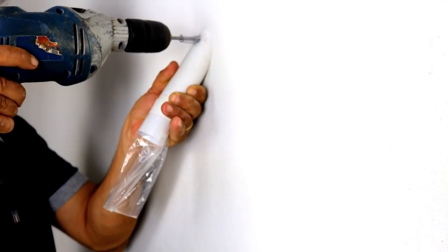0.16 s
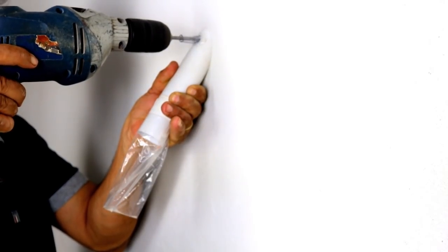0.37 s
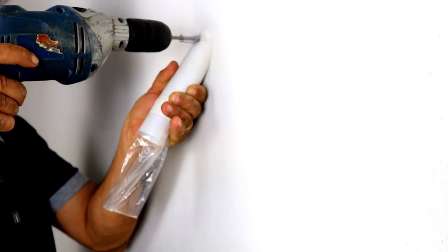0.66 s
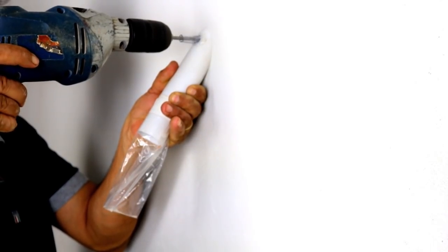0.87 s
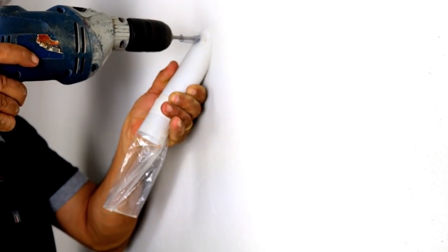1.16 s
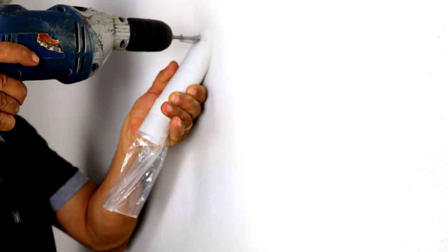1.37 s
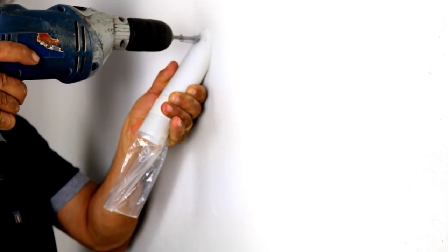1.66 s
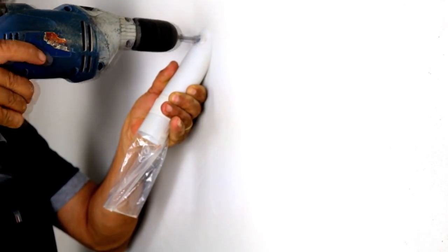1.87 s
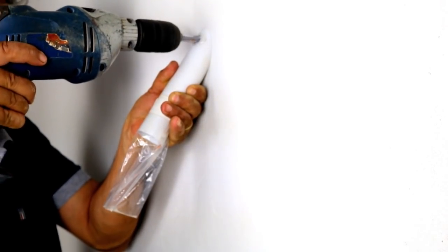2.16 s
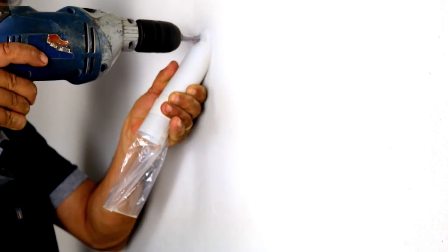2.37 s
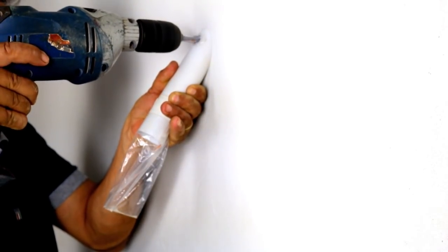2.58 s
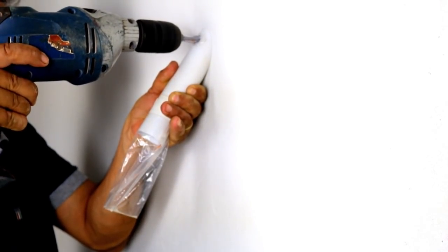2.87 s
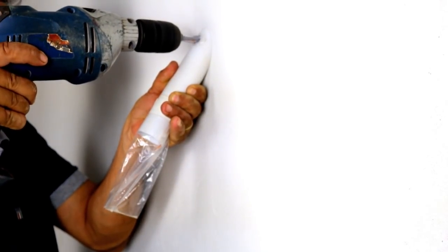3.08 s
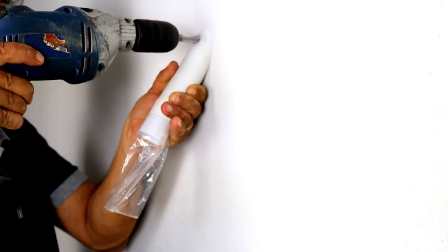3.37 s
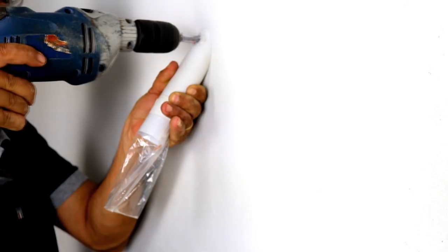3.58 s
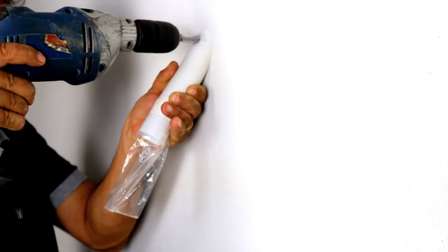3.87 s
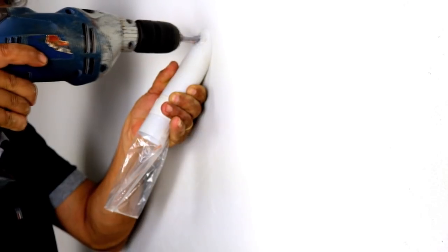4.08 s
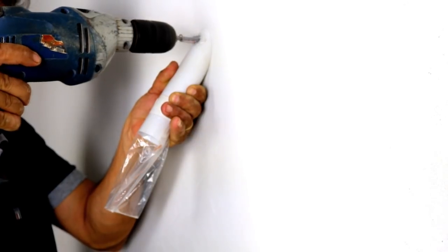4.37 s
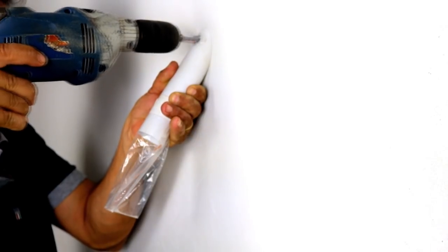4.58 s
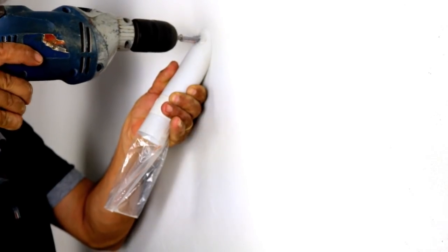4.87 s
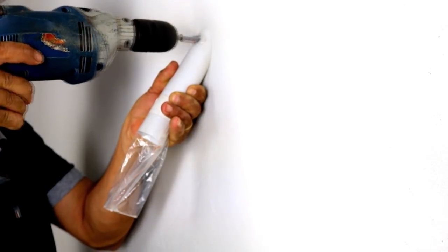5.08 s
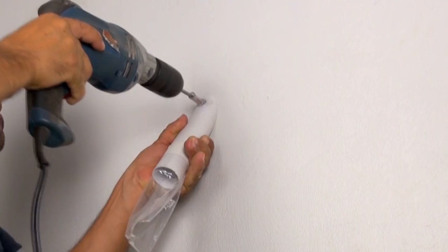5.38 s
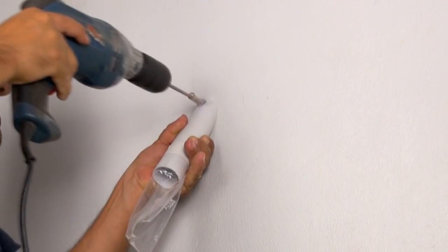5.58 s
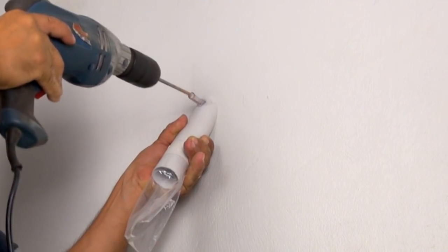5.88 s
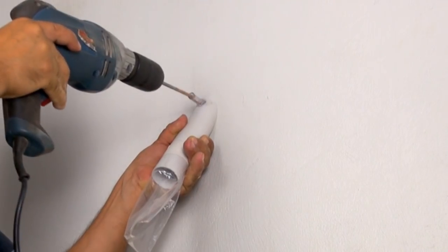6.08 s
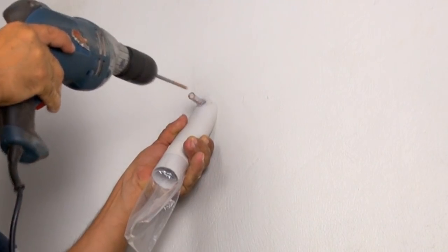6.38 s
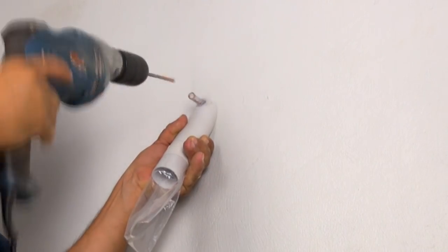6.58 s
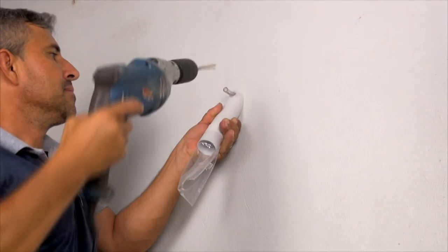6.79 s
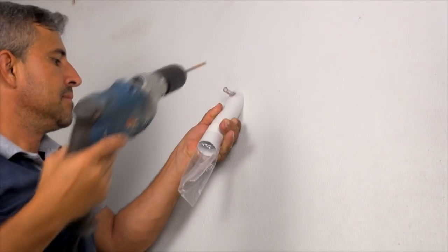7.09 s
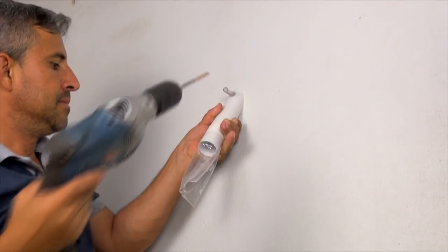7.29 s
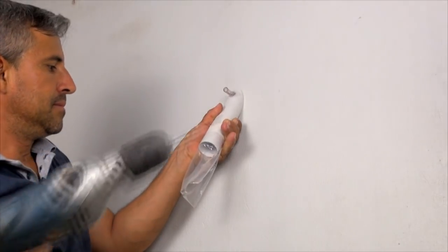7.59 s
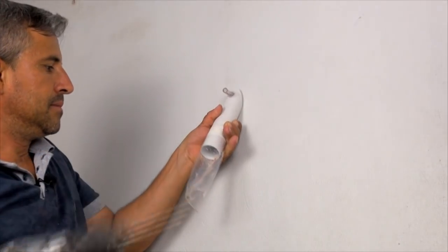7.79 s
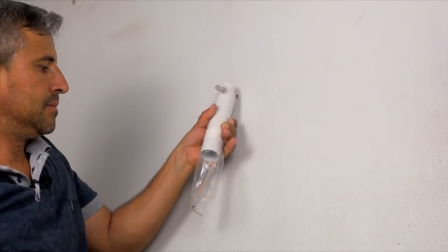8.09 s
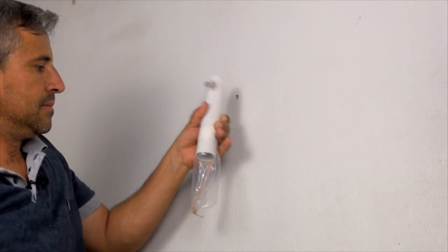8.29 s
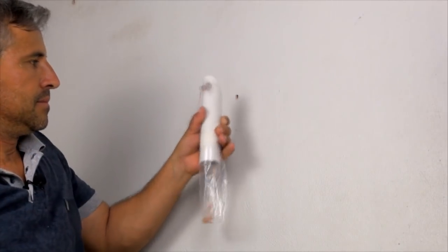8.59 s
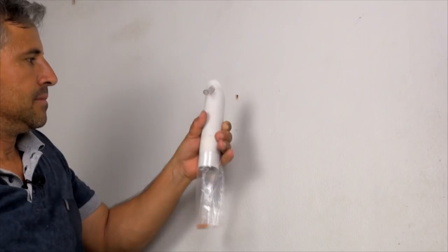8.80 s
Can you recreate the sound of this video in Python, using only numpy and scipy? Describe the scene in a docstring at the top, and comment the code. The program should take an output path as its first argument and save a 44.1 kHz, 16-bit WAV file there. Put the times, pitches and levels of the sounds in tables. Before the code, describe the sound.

A corded drill bores loudly into a wall, revs once more and winds down, followed by a brief plastic bag crinkle.

```python
"""Hammer drill in masonry

A corded drill bores into a wall indoors, its ratchet hammering at first. It is pulled out, spun up
once more and let go, so that fan whine, gear mesh and chuck throb wind down. A plastic bag rustles
at the end. One close microphone, buffeted by the fan's air and overloaded at full speed."""
import sys
import numpy as np
from scipy import signal
from scipy.fft import rfft, irfft, next_fast_len
from scipy.io import wavfile
from scipy.ndimage import uniform_filter1d

SR = 44100
rng = np.random.default_rng(int(sys.argv[2]) if len(sys.argv) > 2 else 0)


def generate_wav(sig):
    """Save sig (samples, or channels by samples) to the path in sys.argv[1] as 16-bit PCM at SR."""
    pcm = np.round(np.clip(np.atleast_2d(sig).T, -1, 1) * 32767).astype(np.int16)
    wavfile.write(sys.argv[1], SR, pcm)


N = 394155
FAN_BLADES, PINION_TEETH, WHEEL_TEETH, RATCHET_TEETH = 37, 5, 48, 16
BAND_LIMIT_HZ = 15650


def amp(db):
    return np.exp(np.asarray(db) * (np.log(10) / 20))


def unit_rms(x):
    return x / np.sqrt(np.mean(x ** 2) + 1e-20)


def at_time(rows, t):
    times_s, *columns = np.transpose(rows)
    return [np.interp(t, times_s, column) for column in columns]


def at_hz(points, hz):
    points_hz, values = np.transpose(points)
    return np.interp(np.log(hz + 1), np.log(points_hz + 1), values)


def wander(rate_hz):
    """Smooth random drift, rms about 1."""
    knots = np.convolve(rng.standard_normal(4000), np.hanning(7), "same")
    return np.interp(np.arange(N) * (4 * rate_hz / SR), np.arange(len(knots)), unit_rms(knots))


def shaped(x, spectrum):
    """Filters x by a spectrum, to rms 1."""
    size = next_fast_len(N)
    gain = amp(at_hz(spectrum, np.fft.rfftfreq(size, 1 / SR)))
    return unit_rms(irfft(rfft(x, size) * gain, size)[:N])


def rotor_tones(orders, rotor_turns, rotor_hz, flutter_db, response=((1, 0), (2, 0))):
    """Tones at multiples of the rotor speed, each fluttering on its own."""
    out, frames = 0, np.arange(0, N, 128)
    for order, db in orders:
        hz = order * rotor_hz[frames]
        flutter = unit_rms(np.convolve(rng.standard_normal(len(frames)), np.hanning(24), "same"))
        gain = amp(db + flutter_db * flutter + at_hz(response, hz)) * (hz < BAND_LIMIT_HZ) * np.sqrt(2)
        phase = 2 * np.pi * (order * rotor_turns + rng.random())
        out = out + np.interp(np.arange(N), frames, gain) * np.sin(phase)
    return out


# Room noise: (frequency [Hz], relative density [dB])
ROOM_SPECTRUM = [(18, -63), (30, -33), (95, -4), (144, -7), (243, -3.5), (369, -10.5), (479, -6),
                 (561, -9.5), (1230, -7.5), (5170, -25.5), (8070, -31.5), (10800, -43), (15500, -39)]


def room_tone():
    """Faint, steady rumble and hiss."""
    return amp(-40.5) * shaped(rng.standard_normal(N), ROOM_SPECTRUM)


# Bag creases: (time [s], level [dB], ring [Hz], relative tick level [dB])
CRACKLES = [(8.459, -36, 1030, -25), (8.573, -25, 1190, -25), (8.621, -23, 1100, -27),
            (8.661, -24, 778, -23), (8.688, -27, 872, -15), (8.709, -12, 2960, -21), (8.742, -23, 915, -25),
            (8.757, -17, 886, -27), (8.769, -28, 953, -22), (8.82, -24, 1080, -26), (8.837, -28, 980, -27),
            (8.857, -28, 894, -21), (8.869, -27, 786, -18), (8.878, -22, 1200, -13),
            (8.912, -26, 1000, -34), (8.921, -20, 1070, -33)]


def plastic_bag():
    """Each crease snaps with a short ring and a treble tick; faint ones come at random."""
    out, t = np.zeros(N + SR), np.arange(400) / SR
    faint = [(8.52 + 0.42 * when, -50 + 12 * force, 700 * 5 ** pitch, -16)
             for when, force, pitch in rng.random((90, 3))]
    attack = np.minimum(t / 0.00035, 1)
    for start_s, db, ring_hz, tick_db in list(CRACKLES) + faint:
        ring = np.sin(2 * np.pi * ring_hz * t) * amp(-60 * t * ring_hz / 14)  # -60 dB in 14 cycles
        tick = np.sin(2 * np.pi * rng.uniform(7600, 9200) * t) * amp(tick_db + 10 - 60 * t / 0.005)
        out[round(start_s * SR):][:len(t)] += amp(db) * (ring + tick) * attack
    return out[:N]


# Noise levels in two runs, in the wall and out of it:
# (time [s], casing [dB], bit and chuck [dB], cooling air [dB], buffeting [dB])
NOISE_LEVELS = [
    [(0.0, -11.5, -14, -22, -33), (0.03, -10, -13, -20.5, -29.5), (0.26, -10.5, -12.5, -20.5, -22),
     (0.32, -9.5, -11.5, -19.5, -31), (0.42, -10.5, -14.5, -21, -26), (0.52, -10, -13, -21, -32),
     (0.71, -10, -12.5, -20.5, -26.5), (1.34, -11, -12.5, -21, -28.5), (1.68, -10, -11.5, -20, -28),
     (1.95, -10, -13, -21, -25.5), (2.0, -11.5, -18, -22, -20), (2.01, -7.5, -10.5, -18.5, -26),
     (2.07, -14.5, -17, -24.5, -32), (2.11, -9.5, -14.5, -21.5, -30), (2.24, -12.5, -21.5, -22.5, -27),
     (2.27, -11.5, -19, -23, -22), (2.41, -12.5, -21, -23, -29.5), (2.58, -10.5, -17.5, -21, -22),
     (2.71, -10, -17, -21.5, -33), (2.9, -9.5, -17.5, -20.5, -20), (3.05, -10.5, -17.5, -21.5, -28),
     (3.08, -10, -21, -21, -19), (3.12, -11, -17.5, -21, -31), (3.29, -9, -18.5, -20, -18),
     (3.35, -9.5, -15, -20, -29), (3.43, -10, -17.5, -20.5, -17), (3.47, -9, -18.5, -20, -26),
     (3.56, -11, -16.5, -20.5, -22), (3.59, -9, -18, -20, -19.5), (4.0, -11, -17, -22, -27.5),
     (4.04, -9.5, -16, -20, -20), (4.11, -10.5, -17.5, -21, -22), (4.17, -10.5, -17, -20.5, -32),
     (4.24, -8.5, -17, -22, -23), (4.29, -10, -16, -21, -27), (4.33, -10.5, -15, -22, -15),
     (4.37, -9.5, -15.5, -20, -31), (4.5, -9.5, -17.5, -23.5, -23), (4.65, -10.5, -17, -22.5, -26),
     (4.8, -10, -19, -23.5, -25), (4.99, -11.5, -19, -23.5, -33), (5.07, -11, -18, -24, -27),
     (5.16, -12.5, -17, -22.5, -33), (5.22, -10.5, -18, -22.5, -25), (5.24, -12, -26, -28, -30)],
    [(5.24, -21, -24, -32, -31), (5.26, -17, -24, -32, -40), (5.42, -18, -22, -30, -37),
     (5.44, -15.5, -20, -30, -33), (5.57, -13.5, -21.5, -27, -28), (5.7, -13.5, -20.5, -27, -22),
     (5.72, -16, -24, -26.5, -33), (5.83, -13.5, -22.5, -25.5, -30), (5.86, -14.5, -21.5, -27, -23),
     (5.92, -14.5, -26, -27, -35), (5.96, -16, -23.5, -27.5, -24), (6.04, -15.5, -26, -28.5, -34.5),
     (6.24, -17.5, -28.5, -30.5, -30), (6.27, -17, -26.5, -30, -36), (6.46, -17.5, -26.5, -31, -38),
     (6.51, -19, -25.5, -30.5, -42), (6.67, -17.5, -28.5, -31.5, -31), (6.87, -20, -31, -32.5, -37),
     (7.04, -21.5, -31, -34.5, -41), (7.37, -24, -29, -36, -42), (7.64, -29.5, -33, -42, -48),
     (7.7, -34, -34, -43, -59), (7.72, -31.5, -34, -43, -49), (7.95, -33, -37, -46, -46),
     (8.07, -33, -36, -48, -58), (8.32, -46, -51, -64, -60), (8.68, -45, -56, -63, -55),
     (8.71, -33, -34, -45, -44), (8.72, -45, -45, -54, -41), (8.76, -34, -44, -48, -49),
     (8.8, -44, -55, -64, -60), (8.86, -38, -44, -57, -47), (8.94, -40, -55, -66, -51)],
]
# Air on the microphone: (frequency [Hz], relative density [dB])
BUFFET_SPECTRUM = [(15, -48), (25, -22.5), (92, 2.5), (254, -3), (400, -9), (520, -29), (880, -120)]


def buffeting(t):
    """Lumps of fan air hit the microphone."""
    level_db = at_time(np.vstack(NOISE_LEVELS), t)[3]
    gusts = rng.standard_normal(N) * amp(2.8 * wander(6))
    return amp(level_db) * shaped(gusts, BUFFET_SPECTRUM)


# Fan on the rotor: (time [s], blade-pass rate [Hz], relative whine level [dB])
FAN_CURVE = [(0.0, 12740, -53), (0.1, 13048, -48), (0.2, 13307, -49), (0.3, 13490, -54), (0.45, 13652, -57),
             (0.6, 13652, -60), (0.8, 13670, -52), (0.93, 13600, -56), (1.0, 13231, -47), (1.1, 12478, -45),
             (1.17, 12111, -43), (1.24, 11985, -43), (1.32, 12180, -44), (1.4, 12482, -44),
             (1.5, 12799, -45), (1.65, 13043, -46), (1.8, 13178, -47), (2.03, 13189, -49),
             (2.15, 13512, -50), (2.3, 13958, -41), (2.45, 14276, -40), (2.6, 14435, -43),
             (2.8, 14534, -42), (3.0, 14610, -42), (3.2, 14723, -42), (3.45, 14836, -44), (3.6, 14617, -41),
             (3.75, 14384, -40), (3.9, 14136, -40), (4.05, 13975, -41), (4.2, 13856, -39),
             (4.35, 13555, -42), (4.5, 13266, -51), (4.7, 13078, -48), (4.9, 12790, -45),
             (5.08, 12575, -41), (5.17, 12249, -44), (5.237, 11980, -38), (5.241, 9110, -38),
             (5.27, 8892, -35), (5.31, 8640, -36), (5.35, 8540, -39), (5.4, 8950, -39), (5.45, 9543, -40),
             (5.5, 10060, -44), (5.55, 10480, -44), (5.6, 10846, -46), (5.645, 10990, -49),
             (5.7, 10705, -46), (5.8, 10106, -42), (5.9, 9534, -42), (6.0, 9000, -36), (6.1, 8480, -25),
             (6.2, 7977, -24), (6.28, 7600, -22), (6.4, 7041, -30), (6.5, 6610, -33), (6.6, 6181, -35),
             (6.7, 5790, -33), (6.8, 5396, -31), (6.9, 5010, -30), (7.0, 4640, -34), (7.1, 4280, -34),
             (7.2, 3929, -36), (7.3, 3590, -36), (7.4, 3260, -36), (7.55, 2800, -43), (7.75, 2200, -43),
             (8.0, 1520, -46), (8.25, 850, -47), (8.6, 100, -48)]
# Side tones: (order [x rotor speed], level re blade-pass tone [dB])
FAN_ORDERS = [(36, -19), (38, -22), (74, -32)]


def fan_whine(t, rotor_turns, rotor_hz):
    """Passing blades whine, with two sidebands and an octave."""
    whine_db = at_time(FAN_CURVE, t)[1]
    orders = [(FAN_BLADES, 0)] + FAN_ORDERS
    return amp(whine_db - 1) * rotor_tones(orders, rotor_turns, rotor_hz, flutter_db=2.5)


# Drive under load: (time [s], mesh [dB], chuck throb [0-1], hammer [0-1], commutator [dB])
LOAD = [(0, -29, 0.1, 0.18, -52), (1, -26, 0.17, 0.3, -52), (1.95, -28, 0.1, 0.12, -52),
        (2.15, -19, 0.3, 0.14, -50), (3, -24, 0, 0, -50), (4, -20.5, 0.07, 0, -50),
        (5.2, -21, 0.24, 0.04, -50), (5.3, -25, 0.45, 0.2, -50), (5.42, -19, 0.38, .03, -50),
        (5.56, -15, 0.38, 0.1, -50), (5.68, -25, 0.29, .03, -50), (6.1, -30, 0.24, 0, -48),
        (6.5, -35, 0.4, 0, -48), (7, -48, 0.54, 0.1, -39), (7.4, -52, .35, .03, -43),
        (7.8, -59, .25, .03, -43), (8.2, -72, 0.2, .03, -62), (8.5, -90, 0.2, .03, -90)]
# Side tones: (order [x rotor speed], level re mesh tone [dB])
GEAR_ORDERS = [(1, -19), (6, -19), (10, -12)]


def gear_mesh(t, rotor_turns, rotor_hz, chuck_turns):
    """Pinion teeth strike the wheel; the mesh is squeezed once a chuck turn."""
    mesh_db, throb, _, _ = at_time(LOAD, t)
    squeeze = 1 + np.clip(2.7 * throb, 0, 1) * np.cos(2 * np.pi * chuck_turns)
    orders = [(PINION_TEETH, 0)] + GEAR_ORDERS
    return amp(mesh_db) * squeeze * rotor_tones(orders, rotor_turns, rotor_hz, flutter_db=2.4)


# Commutator tones: (order [x rotor speed], relative level [dB])
BAR_ORDERS = [(12, -8), (24, -1), (48, -6), (72, 0), (96, 0), (120, -7)]
# Their path through the casing: (frequency [Hz], gain [dB])
CASING_RESPONSE = [(500, -14), (1500, -8), (2300, 4), (4300, 3), (6000, -12), (9000, -10), (15000, -27)]


def commutator(t, rotor_turns, rotor_hz):
    """Brushes cross 24 bars, heard through the casing."""
    bars = rotor_tones(BAR_ORDERS, rotor_turns, rotor_hz, flutter_db=2.5, response=CASING_RESPONSE)
    return amp(at_time(LOAD, t)[3]) * bars


# Tight spot of the chuck: (valid from [s], angle [turns])
TIGHT_SPOT = [(0, -.3), (5.24, .31)]


def drive_train(t):
    """The rotor turns the chuck through a reduction gear."""
    rotor_hz = at_time(FAN_CURVE, t)[0] / FAN_BLADES
    rotor_turns = np.cumsum(rotor_hz) / SR
    from_s, angle_turns = np.transpose(TIGHT_SPOT)
    tight_turns = angle_turns[np.searchsorted(from_s, t, "right") - 1]
    return rotor_turns, rotor_hz, rotor_turns * PINION_TEETH / WHEEL_TEETH - tight_turns


def rattle(t, rotor_turns, chuck_turns):
    """Uneven ratchet blows and grit, shaken once a rotor turn."""
    hammer = at_time(LOAD, t)[2]
    strikes = np.diff(np.floor(RATCHET_TEETH * chuck_turns), prepend=0) == 1
    blows = unit_rms(strikes * (1 + 0.59 * rng.standard_normal(N)) - strikes.mean())
    grit = unit_rms(rng.standard_normal(N) * amp(0.78 * wander(100) + 0.32 * wander(8)))
    shake = 1 + 0.17 * np.cos(2 * np.pi * rotor_turns)
    return shake * (grit + hammer * blows)


# Noise spectra of stages 0-4: (frequency [Hz], relative density [dB])
HAMMERING = [(150, -44), (250, -13.5), (450, -11.5), (535, -11), (624, -8.5), (693, -11), (1180, 0),
             (1510, -5), (1820, -2), (2200, -7.5), (3170, -4), (4100, -14.5), (6210, -14.5), (8470, -21.5),
             (15500, -53.5)]
BORING = [(150, -42), (250, -14.5), (385, -8.5), (553, -9.5), (897, -1), (1200, 1), (1920, -1.5),
          (2320, -8.5), (3170, -4), (4960, -23.5), (5700, -21.5), (7510, -23), (11600, -43.5), (14500, -50),
          (15500, -53)]
WITHDRAWING = [(150, -39), (250, -14), (341, -20), (508, -8.5), (705, -7.5), (755, 0), (1360, -3.5),
               (2240, -9), (2950, -3.5), (3450, -13), (4250, -16), (5050, -21), (7640, -19), (10100, -34.5),
               (15500, -60)]
COASTING = [(150, -44), (250, -14), (405, -11), (717, -5.5), (768, -3.5), (1030, -11), (1360, -1),
            (1790, -8.5), (2240, -9), (2850, -14), (4170, -18.5), (5410, -25), (7510, -18.5),
            (12000, -42.5), (15500, -67)]
STOPPED = [(150, -34), (250, -4), (297, -17), (405, -8), (458, -9), (669, -12), (913, -7), (1640, -17),
           (3060, -15), (5700, -33), (8190, -34), (11000, -48), (15500, -45)]
# Stage schedule, paired lists: (time [s]) and (stage [0-4])
STAGE_TIMES_S = [0, 2.0, 2.1, 5.235, 5.245, 6.2, 7.0, 8.0, 8.4]
STAGE_INDEX = [0, 0, 1, 1, 2, 2, 3, 3, 4]
# Casing resonances: (frequency [Hz], width [Hz], boost [dB])
CASING_MODES = [(790, 60, 8), (1330, 200, 5), (2180, 150, 2.5), (8300, 200, 5)]


def stage_colour(hz, t):
    """Spectral gain gliding from stage to stage; the casing rings as the air dies."""
    spectra_db = np.array([at_hz(s, hz) for s in (HAMMERING, BORING, WITHDRAWING, COASTING, STOPPED)]).T
    stage = np.interp(t, STAGE_TIMES_S, STAGE_INDEX)
    earlier = np.minimum(stage.astype(int), 3)
    blend = stage - earlier
    colour_db = spectra_db[:, earlier] * (1 - blend) + spectra_db[:, earlier + 1] * blend
    rings_db = sum(db / (1 + (2 * (hz - mode_hz) / width_hz) ** 2)
                   for mode_hz, width_hz, db in CASING_MODES)
    return amp(colour_db + rings_db[:, None] * np.clip(stage - 2, 0, 1))


# Chuck throb by frequency: (frequency [Hz], share [0-1])
THROB_SHARE = [(300, .2), (750, 0.2), (1400, 0.8), (3000, 0.4), (6000, 0.09), (15000, .05)]


def drill_noise(excitation, chuck_turns):
    """Casing, bit and cooling air each sound in their own band, throbbing once a chuck turn."""
    hz, t, spectrum = signal.stft(excitation, SR, nperseg=512, noverlap=384)
    colour = stage_colour(hz, t)

    def above(edge_hz):
        return 1 / (1 + (edge_hz / (hz[:, None] + 1)) ** 16)

    casing, bit, air = above(262) * (1 - above(2020)), above(2200) - above(4290), above(4400)
    power = 0
    for band, level_db in zip((casing, bit, air), at_time(np.vstack(NOISE_LEVELS), t)):
        power = power + band * amp(level_db) ** 2 / (band * colour ** 2).mean(0)
    patches = uniform_filter1d(rng.standard_normal(spectrum.shape), 6, axis=0)
    flicker = amp(0.67 * unit_rms(uniform_filter1d(patches, 24, axis=1)))
    chuck_phase = 2 * np.pi * np.interp(t, np.arange(N) / SR, chuck_turns)
    throb = 1 + at_hz(THROB_SHARE, hz)[:, None] * at_time(LOAD, t)[1] * np.cos(chuck_phase)
    spectrum = spectrum * colour * np.sqrt(power) * flicker * throb
    return signal.istft(spectrum, SR, nperseg=512, noverlap=384)[1][:N]


# Instant dips of the whole sound: (time [s], width [s])
DIPS = [(5.239, 0.0029), (6.756, 0.003)]


def scene():
    """Drill, bag and room, the same in both channels."""
    t = np.arange(N) / SR
    rotor_turns, rotor_hz, chuck_turns = drive_train(t)
    mix = drill_noise(rattle(t, rotor_turns, chuck_turns), chuck_turns)
    mix += fan_whine(t, rotor_turns, rotor_hz)
    mix += gear_mesh(t, rotor_turns, rotor_hz, chuck_turns)
    mix += commutator(t, rotor_turns, rotor_hz)
    mix += buffeting(t) + plastic_bag() + room_tone()
    for dip_s, width_s in DIPS:
        mix *= 1 - 0.95 * np.exp(-((t - dip_s) / width_s) ** 2)
    return np.array([mix, mix])


def record(dry):
    """Microphone overload flattens the peaks; a low-pass follows."""
    clipped = np.clip(0.98 * dry, -0.97, 0.97)
    lowpass = signal.firwin(511, BAND_LIMIT_HZ, window=("kaiser", 9), fs=SR)
    return signal.oaconvolve(clipped, lowpass[None], "same")


dry = scene()
out = record(dry)
generate_wav(out)
```